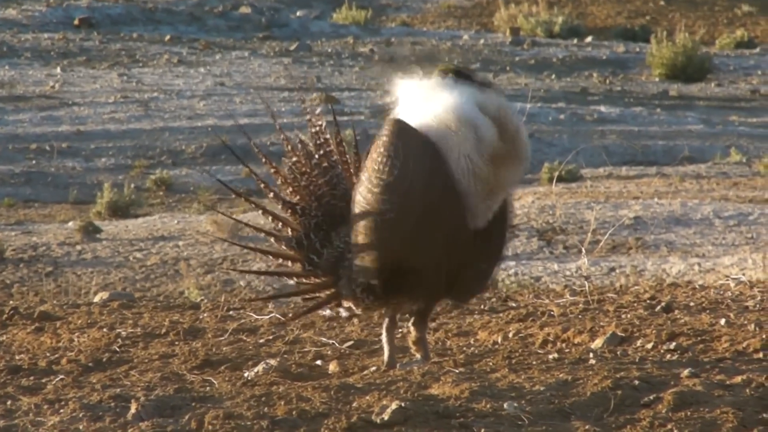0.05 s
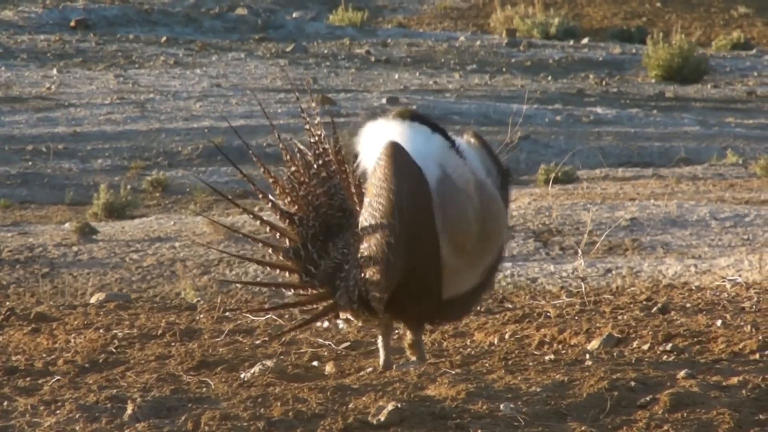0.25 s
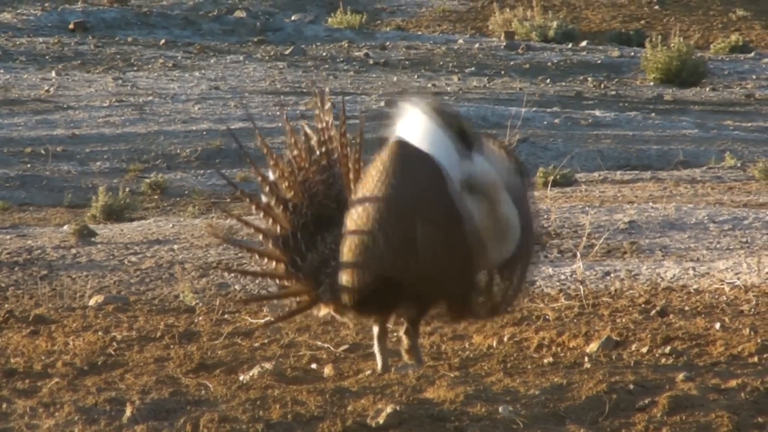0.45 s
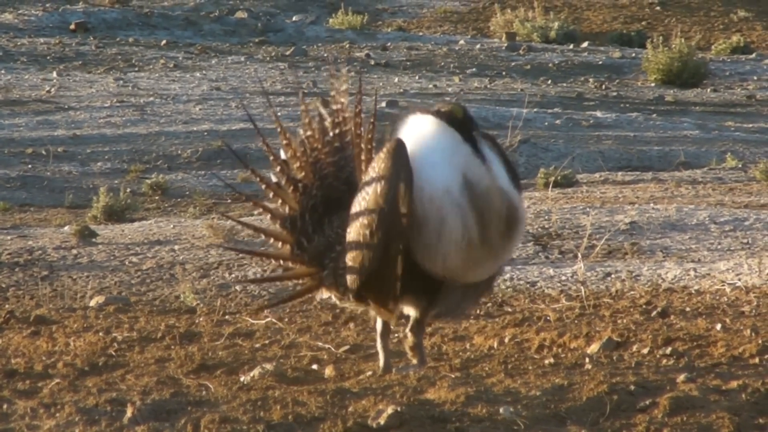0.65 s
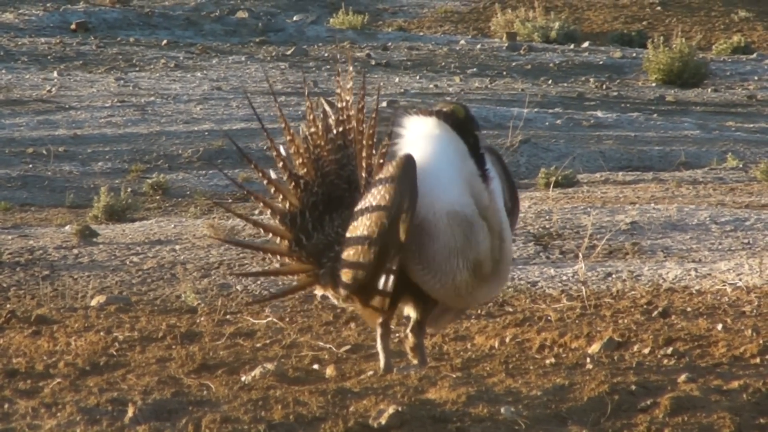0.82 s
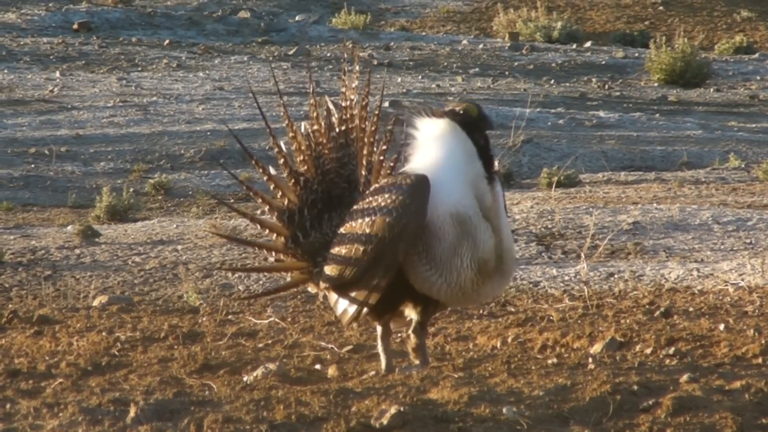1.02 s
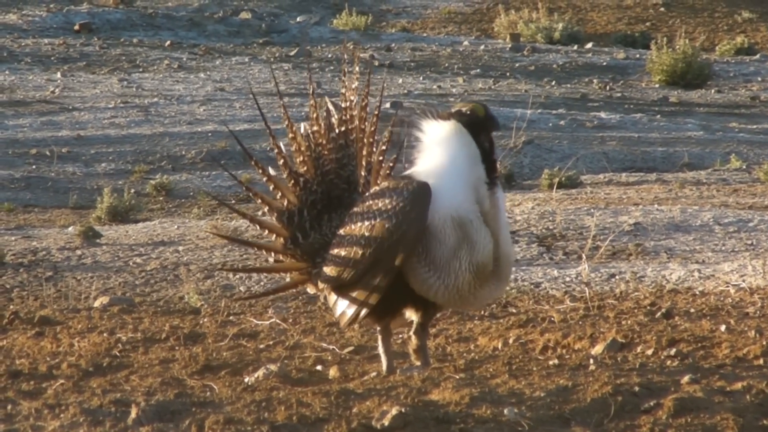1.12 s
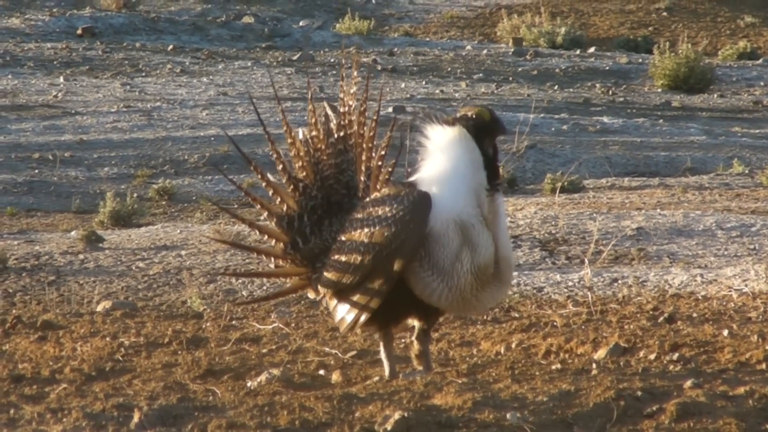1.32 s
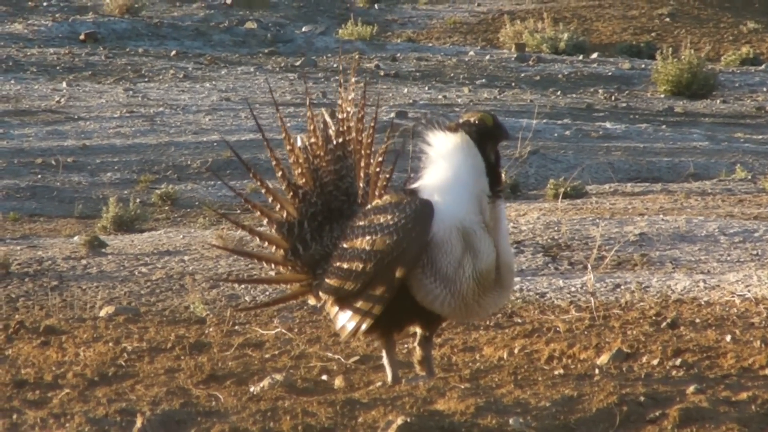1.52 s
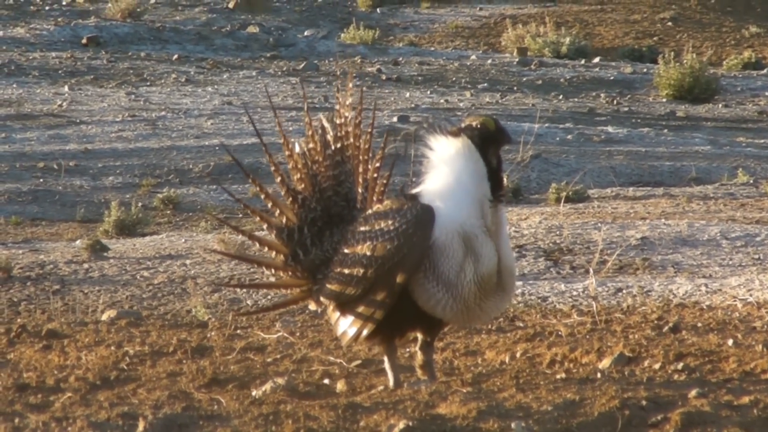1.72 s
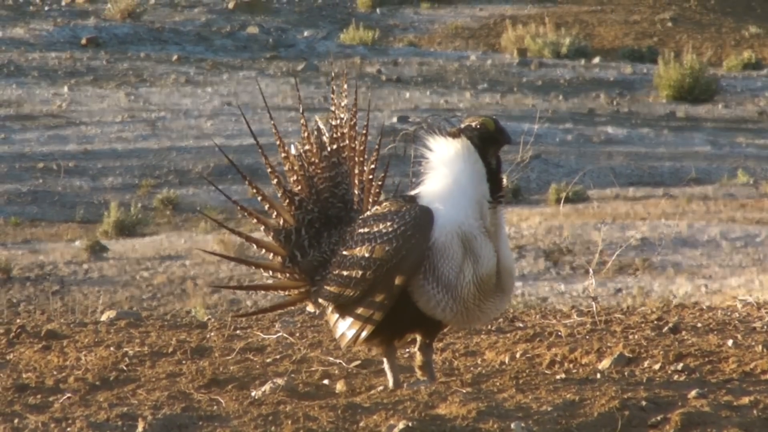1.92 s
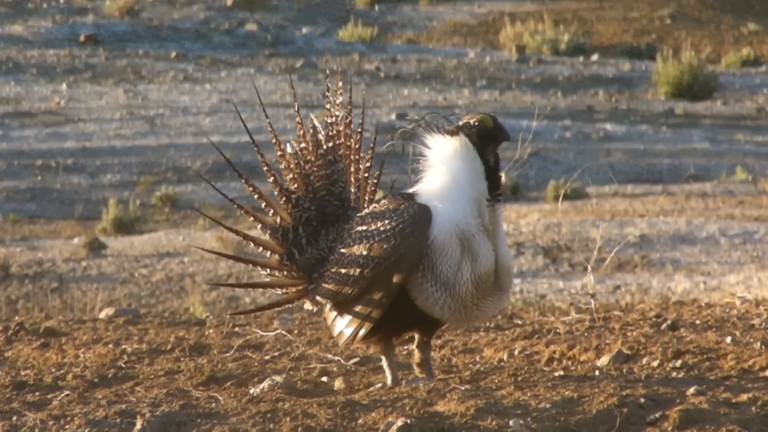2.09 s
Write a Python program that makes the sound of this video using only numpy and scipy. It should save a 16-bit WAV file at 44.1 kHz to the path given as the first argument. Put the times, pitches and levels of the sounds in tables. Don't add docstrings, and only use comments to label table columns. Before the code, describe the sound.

Male grouse display: soft coos, a snapping thump, rising whistle, ringing bloop, with distant rivals bubbling

```python
import sys
import numpy as np
from scipy import signal
from scipy.fft import rfft, irfft, next_fast_len
from scipy.io import wavfile
from scipy.ndimage import uniform_filter1d, map_coordinates

SR = 44100
rng = np.random.default_rng(int(sys.argv[2]) if len(sys.argv) > 2 else 0)


def volts_from_decibels(level):
    exponent = np.asarray(level, float) / 20
    return 10 ** exponent


def wrap_up_sound(samples):
    columns = np.atleast_2d(samples).T
    tamed = np.clip(columns, -1, 1)
    steps = np.round(tamed * 32767).astype(np.int16)
    wavfile.write(sys.argv[1], SR, steps)


N = 94815
T = np.arange(N) / SR
TOP_HZ = 15950


def unit(x):
    return x / np.sqrt(np.mean(x ** 2) + 1e-20)


def along(points, hz):
    f, v = np.transpose(points)
    return np.interp(np.log(hz + 1), np.log(f + 1), v)


def filtered(x, response):
    m = next_fast_len(N + 8192)
    spectrum = rfft(x, m) * response(np.fft.rfftfreq(m, 1 / SR))
    return irfft(spectrum, m)[..., :N]


def pan(x, left_minus_right_db):
    return x * volts_from_decibels(np.array([[left_minus_right_db / 2], [-left_minus_right_db / 2]]))


def bell(s, width_s):
    return np.exp(-.5 * ((T - s) / width_s) ** 2)


def wobble(rate_hz):
    knots = rng.standard_normal(int(N * rate_hz / SR) + 4)
    return map_coordinates(knots, [T * rate_hz])


def glide(rows):
    s, hz, db = np.transpose(rows)
    edge = np.clip(np.minimum(T - s[0], s[-1] - T) / 0.0023, 0, 1)
    pitch_hz = uniform_filter1d(np.interp(T, s, hz), size=260)
    phase = 2 * np.pi * np.cumsum(pitch_hz) / SR
    return np.sqrt(2) * edge * volts_from_decibels(np.interp(T, s, db)) * np.sin(phase)


def puff(s, width_s, hz, wide_hz):
    def resonance(f):
        return (1j * f * wide_hz / (hz * hz - f * f + 1j * f * wide_hz)) ** 2

    return unit(filtered(rng.standard_normal(N), resonance)) * bell(s, width_s)


# frequency in Hz, density in dB per Hz.
HISS_SPECTRUM = [(35, -14), (70, -3.5), (130, -1), (200, -4.5), (285, -11), (600, -8), (3400, -16.5),
                 (15900, -22.5)]
# frequency in Hz, correlation from -1 to 1.
HISS_LIKENESS = [(60, 0.95), (180, 0.65), (550, -0.04), (1650, 0.18), (4970, 0.17), (15000, -0.1)]


def hiss():
    z = signal.stft(rng.standard_normal((2, N)), nperseg=512)[2]
    patches = uniform_filter1d(rng.standard_normal(z.shape[1:]), size=6, axis=0)
    patches = uniform_filter1d(patches, size=10, axis=1)
    pair = signal.istft(z * volts_from_decibels(0.91 * unit(patches)), nperseg=512)[1][:, :N]

    def mid_side(hz):
        turn = np.arccos(np.clip(along(HISS_LIKENESS, hz), -1, 1)) / 2
        return volts_from_decibels(along(HISS_SPECTRUM, hz)) * (hz < TOP_HZ) * [np.cos(turn), np.sin(turn)]

    mid, side = filtered(pair, mid_side)
    level_db, pan_db = -58, 3
    return pan(volts_from_decibels(level_db) * unit(np.array([mid + side, mid - side])), pan_db)


def chirr():
    level_db, hz, wide_hz = -72, 3550, 340
    swell = volts_from_decibels(level_db + 0.92 * wobble(19.0))
    return swell * np.array([puff(0.65, 9, hz, wide_hz) for _ in "LR"])


def gust():
    level_db = -59.5
    return volts_from_decibels(level_db) * puff(s=0.45, width_s=0.26, hz=104.4, wide_hz=86)


# centre in seconds,
# half length in seconds, centre in Hz, width in Hz, level in dB.
RUSTLES_NEAR = [(.008, .02, 3400, 1800, -51), (.026, .008, 6000, 2000, -60), (.41, .06, 3600, 2600, -55),
                (1.385, .004, 4500, 700, -55), (.008, .02, 430, 200, -58), (.769, .005, 4400, 2500, -55),
                (.49, .012, 2000, 2600, -46), (.508, .016, 2200, 2200, -44), (.57, .035, 2600, 3000, -54),
                (.683, .008, 3400, 2000, -51), (.706, .028, 2600, 2600, -55), (.38, .3, 10000, 7000, -72),
                (.27, .12, 3000, 2000, -66), (.498, .05, 13000, 4000, -64), (.575, .05, 1300, 1300, -60),
                (.556, .004, 550, 700, -47), (.565, .012, 950, 300, -54), (.557, .004, 1750, 700, -50),
                (.57, .003, 550, 700, -52), (1.387, .006, 2500, 350, -55), (1.385, .004, 3400, 600, -57),
                (1.372, .008, 3400, 700, -62), (1.489, .006, 2500, 400, -61), (1.492, .006, 750, 400, -56),
                (.628, .005, 2500, 500, -58), (.499, .007, 850, 250, -47), (.66, .03, 650, 300, -64),
                (1.125, .006, 900, 300, -59), (1.278, .006, 950, 300, -60), (.694, .002, 3000, 900, -47)]


def rustles():
    spread = 0.51
    out = 0
    for s, half_s, hz, wide_hz, db in RUSTLES_NEAR:
        mid, side = (puff(s, half_s / 2, hz, wide_hz) for _ in "ms")
        out = out + volts_from_decibels(db) * (mid + spread * side * np.array([[1], [-1]]))
    return out


def blips(rows, cycles):
    out = 0
    for s, db, hz, lr_db in rows:
        tone = np.sin(2 * np.pi * hz * T + rng.uniform(0, 5.6))
        out = out + pan(volts_from_decibels(db) * bell(s + cycles / hz, cycles / hz) * tone, lr_db)
    return out


def crowd():
    level_db, centre_hz, pitch_spread, size_db = -65, 441.9, 0.138, 4.5
    t = np.arange(SR // 25) / SR
    shape = np.exp(-.5 * ((t - .02) / 0.0052) ** 2)
    out = np.zeros((2, N + len(t)))
    for when, pitch, size, side in rng.random((320, 4)):
        hz = centre_hz * np.exp(pitch_spread * 3.45 * (pitch - .5))
        note = volts_from_decibels(-size_db * np.log(size + 0.048)) * shape * np.sin(2 * np.pi * hz * t)
        start = int(when * N)
        out[:, start:start + len(t)] += pan(note, 2.5 + 6 * (side - .5))
    return volts_from_decibels(level_db) * unit(out[:, :N])


# start in
# seconds, peak in dB, pitch in Hz, left minus right in dB.
FAR_BLOOP_ROWS = [(0.972, -47.5, 378, 1.5), (1.024, -51.5, 517, 8), (1.121, -51, 501, 8),
                  (1.203, -61, 415, 16), (1.276, -48, 452, 3), (1.488, -64, 433, 16), (1.536, -50, 439, 3),
                  (1.591, -58, 528, 11), (1.637, -46.5, 295, 3.5), (1.881, -59, 369, 0),
                  (1.938, -53.5, 417, 5), (1.988, -54.5, 363, 11), (2.039, -57, 441, 3.5)]
FAR_THUMP_ROWS = [
    (0.041, -45.5, 129, -0.5),
    (0.08, -51.5, 129.7, 0),
    (0.569, -41, 160.6, 2),
    (0.87, -65, 146, 4),
    (1.238, -54, 123.3, 1.0),
    (1.697, -55.5, 127.4, -1),
    (1.779, -61, 200, -2),
]
FAR_SNAP_ROWS = [(0.166, -46, 4500, 1.0), (0.6335, -44.5, 1830, 0.5), (0.765, -52.5, 1880, 1.0),
                 (0.839, -66, 3570, 2.5), (0.9217, -52, 2260, 1.2), (0.9747, -52.5, 1960, 1.5),
                 (1.119, -55, 1830, 3.0), (1.273, -54, 2350, 1.5), (1.3528, -56, 3290, 2.0),
                 (1.434, -49, 1520, 1.5), (1.695, -44.5, 1510, 1.0), (1.8837, -51.5, 1920, 2.5),
                 (1.938, -49.5, 2420, 3.0), (1.9902, -49, 1884, 1.0), (2.0435, -48, 895, 2.5)]


def far_birds():
    width_s, wide_ratio = .0022, .7
    ticks = 0
    for s, db, hz, lr_db in FAR_SNAP_ROWS:
        breath = volts_from_decibels(db - 9.0) * puff(s + width_s, width_s, hz, wide_ratio * hz)
        ring = volts_from_decibels(db - 8.5) * bell(s + 0.00041, 0.0011) * np.sin(2 * np.pi * hz * T)
        ticks = ticks + pan(breath + ring, lr_db)
    return blips(FAR_BLOOP_ROWS, cycles=1.0) + blips(FAR_THUMP_ROWS, cycles=1.3) + ticks


# time in seconds, pitch in Hz, level in dB.
NEAR_COOS = [
    [(.205, 400, -64), (.215, 390, -53), (.228, 430, -62), (.242, 480, -45), (.252, 490, -46),
     (.257, 460, -56), (.268, 435, -45), (.284, 395, -48), (.297, 350, -62)],
    [(.3, 430, -58), (.322, 440, -49), (.334, 470, -38), (.345, 500, -32.5), (.356, 512, -32),
     (.378, 510, -40), (.385, 500, -47), (.399, 480, -49)],
    [(.397, 470, -50), (.405, 495, -41), (.42, 520, -45), (.44, 515, -52), (.453, 435, -40),
     (.462, 400, -46), (.475, 385, -60)],
]
# time in seconds, pitch in Hz, level in dB.
RIVAL_COOS = [
    [(0.222, 340, -66), (0.232, 345, -58), (0.245, 376, -52.5), (0.265, 397, -55)],
    [(0.335, 396, -59), (0.381, 409, -52), (0.398, 393, -50.5), (0.43, 366, -57)],
]
# time in seconds, pitch in Hz, level in dB.
THROAT_NOTES = [
    [(.481, 440, -58), (.488, 413, -45), (.496, 340, -42), (.502, 330, -50)],
    [(.508, 390, -52), (.516, 420, -48), (.524, 430, -60)],
    [(.69, 202.3, -52), (.7, 200, -50), (.712, 210, -57), (.75, 200, -63)],
]


def coos():
    return sum(map(glide, [*NEAR_COOS, *RIVAL_COOS, *THROAT_NOTES]))


# first pop in seconds, thump in dB, gap to second pop in seconds, bloop in dB.
DISPLAYS = [
    (.4971, -26.5, .1995, -26),
    (.398, -47.5, .192, -39),
    (.557, -43, .199, -44),
    (1.4335, -40.5, 0.23, -54),
]


def pops():
    thump_hz, lag_s, width_s = 176, .0068, .0042
    bloop_hz, rise_s, hold_s, t60_s = 371.2, 0.0011, 0.0126, 0.035
    out = np.zeros(N)
    for s, thump_db, gap_s, bloop_db in DISPLAYS:
        peak_s = s + lag_s
        out += volts_from_decibels(thump_db) * bell(peak_s, width_s) * np.cos(2 * np.pi * thump_hz * (T - peak_s))
        t = np.clip(T - s - gap_s, 0, None)
        shape = (1 - np.exp(-t / rise_s)) * volts_from_decibels(-60 * np.clip(t - hold_s, 0, None) / t60_s)
        out += volts_from_decibels(bloop_db) * shape * np.sin(2 * np.pi * bloop_hz * (t - .0004))
    return out


# seconds after first pop, pitch in Hz, level
# in dB.
NEAR_WHISTLE = [(.015, 1060, -5), (.022, 1180, -3), (.035, 1340, -2), (.049, 1590, -5), (.057, 1980, -9),
                (.071, 2620, 2), (.081, 1790, -2),
                (.092, 900, -9), (.1, 660, -12), (.108, 590, -10), (.122, 720, -14), (.135, 980, -15),
              (.15, 1500, -13)]
# time in seconds, pitch in Hz, level in dB.
FAR_WHISTLES = [
    [(.402, 1050, -66), (.422, 1370, -61), (.44, 1780, -64), (.455, 2350, -62), (.463, 2520, -63),
     (.475, 2000, -73)],
    [(.586, 1350, -66), (.6, 1600, -62), (.611, 2050, -60), (.618, 2250, -70)],
    [(1.432, 810, -58), (1.445, 900, -58), (1.465, 1150, -63), (1.484, 1480, -66)],
]


def whistles():
    near_db, unsteady, rate_hz = -47, .25, 160
    near = np.array(NEAR_WHISTLE) + [DISPLAYS[0][0], 0, near_db]
    return sum((1 + unsteady * wobble(rate_hz)) * glide(rows) for rows in [near, *FAR_WHISTLES])


def sac_swell():
    level_db, hz, length_s = -43.5, 344, .022
    other_hz, other_gain = 455, .6
    t = T - (DISPLAYS[0][0] + DISPLAYS[0][2])
    swell = np.clip((t + length_s) / 0.0041, 0, 1) * (t < 0)
    first = np.cos(2 * np.pi * hz * (t + 0.0017))
    other = np.cos(2 * np.pi * other_hz * (t + 0.01044))
    return volts_from_decibels(level_db) * swell * (first + other_gain * other)


SNAP_AT_S = [.3985, .49715, .49805, .6963, 1.3845, .5061]
# level in dB, ring in Hz, second ring in Hz, high crack in dB.
SNAP_ROWS = [
    (-32, 2240, 1450, -56),
    (-17.5, 3340, 1200, -66),
    (-16, 2940, 1540, -40),
    (-20.5, 3440, 4300, -34.5),
    (-42, 3300, 4300, -58),
    (-26, 1950, 2100, -70),
]
# start in seconds, length in seconds, from Hz, to Hz, level in dB.
SKIN_FLUTTER = (.5006, .0062, 1030, 2000, -29)


def snaps():
    t60_s, second_db, crack_s = .0045, -4, .00025
    side_pitch = [[1], [1.07]]
    out = np.zeros((2, N))
    for s, (db, ring_hz, second_hz, crack_db) in zip(SNAP_AT_S, SNAP_ROWS):
        t = np.clip(T - s, 0, None)
        ring = np.cos(2 * np.pi * ring_hz * t * side_pitch)
        ring = ring + volts_from_decibels(second_db) * np.cos(2 * np.pi * second_hz * t)
        rise = np.exp(-(np.clip(s - T, 0, None) / .00006) ** 2)
        out -= volts_from_decibels(db - 4.5) * rise * ring * volts_from_decibels(-60 * t / t60_s)
        out += volts_from_decibels(crack_db) * puff(s + crack_s, crack_s, 12900, 14000)
    s, length_s, from_hz, to_hz, db = SKIN_FLUTTER
    flap_hz = np.interp(T, [s, s + length_s], [from_hz, to_hz]) * (T > s)
    phase = 2 * np.pi * np.cumsum(flap_hz) / SR
    flaps = np.cos(phase + 3.0) + .5 * np.cos(2 * phase + 5.4)
    return out + volts_from_decibels(db) * bell(s + length_s / 2, length_s / 5) * flaps


# time in seconds, pitch in Hz, level in dB.
SONGBIRD_NOTES = [
    [(1.19, 4400, -80), (1.198, 4290, -68.5), (1.24, 4220, -67.5), (1.3, 4340, -75)],
    [(1.42, 4223, -71), (1.45, 4060, -69), (1.494, 4200, -68.5), (1.53, 4250, -87)],
]


def piping():
    return pan(sum(map(glide, SONGBIRD_NOTES)), 2.5)


def field(x):
    t60_s, level_db = .1, -19
    t = np.arange(SR // 5) / SR
    tail = rng.standard_normal((2, len(t))) * volts_from_decibels(-60 * t / t60_s)
    tail = tail / np.linalg.norm(tail[0])
    return volts_from_decibels(level_db) * signal.fftconvolve(x, tail, axes=1)[:, :N]


def scene():
    near = coos() + pops() + whistles() + sac_swell() + snaps() + rustles()
    far = far_birds() + crowd() + chirr() + piping()
    return pan(near, 1.5) + field(near) + far + gust() + hiss()


def low_pass(x):
    return signal.sosfilt(signal.butter(12, 16830, fs=SR, output="sos"), x)


def record(dry):
    low_cut_hz = 45

    def response(f):
        return (1j * f / (low_cut_hz + 1j * f)) ** 2 * (f < TOP_HZ)

    return low_pass(filtered(dry, response))


dry = scene()
out = record(dry)
wrap_up_sound(out)
```